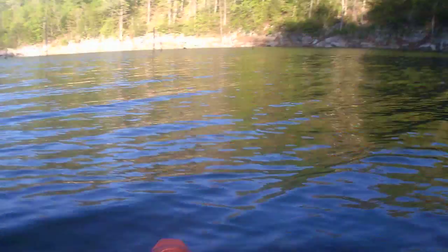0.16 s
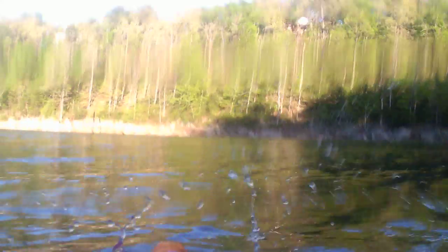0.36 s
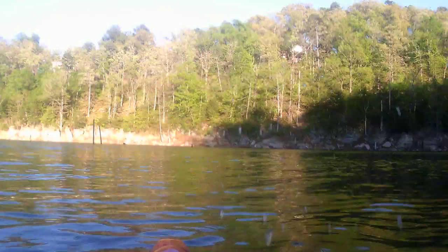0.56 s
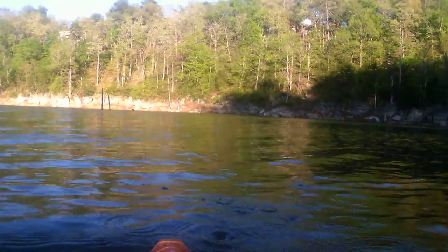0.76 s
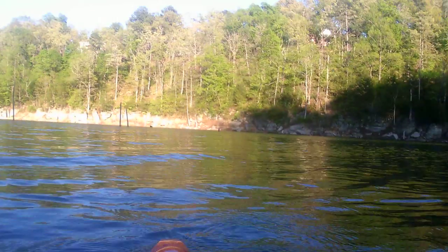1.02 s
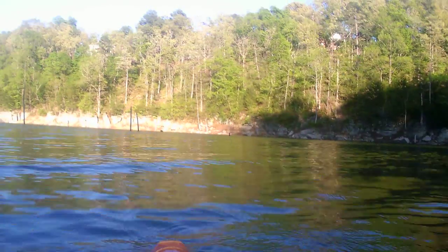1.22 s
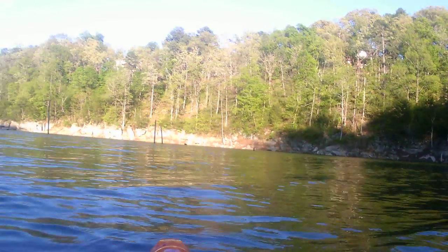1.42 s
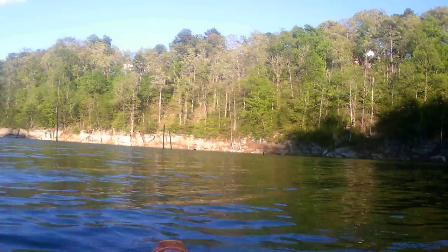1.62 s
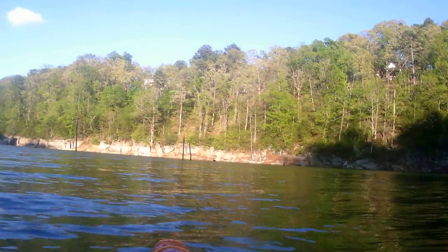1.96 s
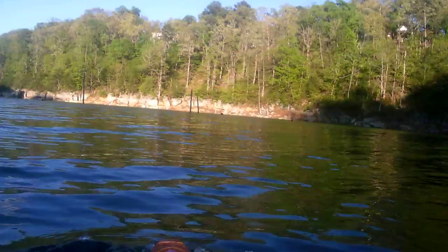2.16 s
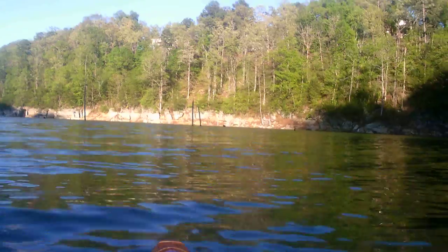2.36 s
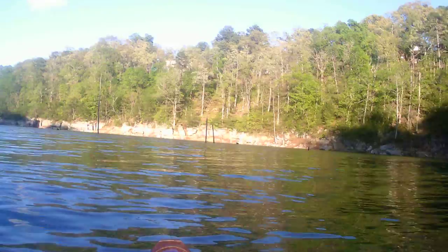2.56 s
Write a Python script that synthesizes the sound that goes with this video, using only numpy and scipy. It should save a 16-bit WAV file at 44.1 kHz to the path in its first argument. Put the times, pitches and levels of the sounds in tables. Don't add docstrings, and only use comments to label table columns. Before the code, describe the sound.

Aboard a model boat on a lake, a closed-in, dull microphone catches splashing slaps, then runoff and drops, then separate gritty motor buzzes with quiet gaps, ending in the loudest burst amid water.

```python
import sys
import numpy as np
from scipy import signal
from scipy.io import wavfile
from scipy.ndimage import uniform_filter1d

SR = 44100
rng = np.random.default_rng(int(sys.argv[2]) if len(sys.argv) > 2 else 0)


def nominal_scale(level):
    x = np.asarray(level, float) / 20
    return 10 ** x


def int16_out(signal):
    q = np.round(np.clip(np.atleast_2d(signal).T, -1, 1) * 32767)
    wavfile.write(sys.argv[1], SR, q.astype(np.int16))


N = 119070

# (start [s], length [s], power [dB], shaft speed [turns/s], coasting decay [dB/s])
THROTTLE_BURSTS = [
    (0.223, 0.17, -4.5, 52.3, 198),
    (1.085, 0.18, 0.5, 53.4, 64.5),
    (1.479, 0.18, -0.5, 52.2, 141.5),
    (1.706, 0.032, -8.5, 70, 127.5),
    (2.222, 0.17, -1.5, 52, 97),
    (2.659, 0.11, 4.5, 55, 100),
]
# (multiple of shaft speed, level [dB])
SHAFT_ORDERS = [(1, -2.5), (2, -12.5), (3, -8), (4, -10), (6, -15), (7, -15.5)]
# (frequency [Hz], level [dB], t60 [s])
KICK_MODES = [(151.8, 5.5, 0.15), (185.5, 3, 0.15), (355, -6, 0.12)]
# (frequency [Hz], width [Hz], level [dB])
HULL_MODES = [(86, 14, -13), (149.5, 13, -9.5), (192.7, 48, -11), (284.1, 8.5, -9.5), (338, 63, -12),
              (484, 110, -12.5), (652.7, 60, -10), (949, 140, -6.5), (1246, 313, -10), (1600, 86, -5.5),
              (2047, 300, -21.5), (2520, 160, -21), (3600, 520, -45)]
# (time [s], mount swing [dB], thump [dB], crack [dB], crack length [s])
WAVE_SLAPS = [(0, -33.5, -31.5, -63, .01), (0.093, -31, -1, 3, 0.0087), (0.102, -35.5, -8.5, -21, 0.015),
              (0.145, -22.5, -4, -35, 0.0077), (0.201, -17, -11.5, -47, 0.026),
              (0.225, -23.5, -4, -2, 0.011), (0.242, -41, 3.5, 8.5, .01), (0.274, 6.5, -4, -2, .01),
              (0.308, -9, -8, -4.5, 0.02), (0.34, -7.5, 1.5, -1.5, 0.0053), (0.375, 2.5, -12, -14, .01),
              (1.3, -16, -2, -21.5, 0.023), (1.425, -19.5, -16.5, -40.5, .01),
              (1.751, -10, -8, -31.5, 0.014), (1.897, -31.5, -32, -38, 0.0036),
              (2.019, -28.5, -38, -42, 0.016), (2.097, -25, -31, -43.5, .01),
              (2.454, -18, -11.5, -29.5, 0.018), (2.583, -38.5, -10.5, -18.5, .01)]
# (frequency [Hz], level [dB], t60 [s])
THUMP_MODES = [(58.62, 0, 0.18), (88.55, -7.5, 0.39), (120.7, 0, 0.11), (170, 0, 0.079), (280, -25.5, 0.64)]
# (time [s], level [dB], pitch [Hz], length [s], splashiness [0-1])
WATER_DROPS = [(0.464, -25, 1650, 0.014, 1), (0.54, -20, 1700, 0.073, 0.7), (0.572, -26, 1600, 0.044, 0.3),
               (0.623, -29.5, 1498, 0.057, 0.66), (0.656, -24.5, 1600, 0.037, .4),
               (0.714, -23, 1750, 0.02, .6), (0.726, -20.5, 1620, 0.025, 0.55),
               (0.774, -34, 1606, 0.033, 0), (0.816, -36.5, 1500, 0.0094, .4),
               (0.858, -35.5, 1450, 0.0061, 0), (0.876, -38.5, 1600, .014, 0.3), (0.931, -36, 1680, .01, 0),
               (0.951, -35, 1650, 0.039, 0), (1.017, -48, 1650, 0.048, 0), (1.925, -31.5, 1700, 0.021, 0.1),
               (1.995, -30.5, 1600, 0.035, 0), (2.061, -19, 1600, 0.025, 0.3),
               (2.096, -14, 1650, 0.027, 0.6), (2.125, -14, 1600, 0.01, 0.5),
               (2.132, -16.5, 1600, 0.018, 0.97), (2.16, -25, 1600, 0.0076, .7),
               (2.2, -31, 1600, 0.0075, 0.7), (2.578, -6.5, 1650, 0.016, 0.6),
               (2.606, -12, 1550, 0.024, .7)]
# (time [s], level [dB])
RUNOFF = [
    (0, -43.5),
    (0.121, 9.5),
    (.22, -9.5),
    (.5, 3.5),
    (.75, -2.5),
    (1.05, -39),
    (1.9, -16.5),
    (2.202, -3.5),
    (2.5, 11),
    (2.7, 4),
]
# (low edge [Hz], high edge [Hz])
HISS_BAND_HZ = [5800, 8300]


def evened(x):
    return x / np.sqrt(np.mean(x ** 2) + 1e-20)


def add(mix, start_s, sound):
    part = mix[round(start_s * SR):][:len(sound)]
    part += sound[:len(part)]


def resonate(x, hz, width_hz):
    r = np.exp(-np.pi * width_hz / SR)
    gain = (1 - r * r) / 2
    return signal.lfilter([gain, 0, -gain], [1, -2 * r * np.cos(2 * np.pi * hz / SR), r * r], x)


def resonate_twice(x, hz, width_hz):
    return resonate(resonate(x, hz, width_hz), hz, width_hz)


def drift(per_s):
    size = max(int(SR / per_s), 2)
    return evened(uniform_filter1d(uniform_filter1d(rng.standard_normal(N), size), size))


def ring(hz, db, t60_s, t):
    return nominal_scale(db - 60 * t / t60_s) * np.sin(2 * np.pi * hz * t)


def hull(x):
    body = np.zeros(len(x))
    for k, (hz, width_hz, db) in enumerate(HULL_MODES):
        body += (-1) ** k * nominal_scale(db) * resonate(x, hz, width_hz) * np.sqrt(2000 / width_hz)
    return signal.lfilter(*signal.butter(1, 3000, fs=SR), body)


def water():
    lap_db, sway_db = -50.5, -34
    trickle_per_s, trickle_db, grain_decay_s = 130, -30.5, 0.0086
    wet = nominal_scale(np.interp(np.arange(N) / SR, *np.transpose(RUNOFF)))
    clicks = (rng.random(N) < trickle_per_s / SR) * nominal_scale(1.4 * np.minimum(rng.exponential(1, N), 3))
    envelope = signal.oaconvolve(clicks, np.exp(-np.arange(900) / SR / grain_decay_s))[:N]
    trickle = nominal_scale(trickle_db) * wet * envelope * rng.standard_normal(N)
    lap = rng.standard_normal(N) * nominal_scale(lap_db + 1.4 * drift(30))
    sway = evened(resonate(rng.standard_normal(N), 34, 1.3))
    heave = evened(resonate_twice(rng.standard_normal(N), 57, 20))
    return hull(lap + trickle) + nominal_scale(sway_db) * (sway + 0.4 * heave)


def drops():
    rise_s = 0.002
    tone, splash, t = np.zeros(N), np.zeros(N), np.arange(4000) / SR
    for start_s, db, hz, length_s, wet in WATER_DROPS:
        puff = rng.standard_normal(len(t))
        shape = nominal_scale(db - 20 * (t / length_s) ** 2.37) * np.minimum(t / rise_s, 1)
        add(tone, start_s, (1 - wet) * shape * evened(resonate_twice(puff, hz, 240)))
        add(splash, start_s, wet * shape * puff)
    high = signal.lfilter(*signal.butter(2, 500, "high", fs=SR), splash)
    cavity = resonate(high, 2700, 200) + nominal_scale(-31) * resonate(high, 3040, 400)
    return tone + nominal_scale(2.5) * hull(high) + cavity


def slaps():
    mount_hz, mount_t60_s = 34.07, 1.1
    thump_rise_s, crack_rise_s, crack_fall_db_per_s = 0.004, 0.0028, 6600
    low, crack, t = np.zeros(N), np.zeros(N), np.arange(2 * SR) / SR
    crack_t = t[:9000]
    thump = sum(ring(*mode, t) for mode in THUMP_MODES) * np.minimum(t / thump_rise_s, 1)
    for start_s, mount_db, thump_db, crack_db, length_s in WAVE_SLAPS:
        add(low, start_s, ring(mount_hz, mount_db, mount_t60_s, t) + nominal_scale(thump_db) * thump)
        fall_db = crack_fall_db_per_s * np.maximum(crack_t - length_s, 0)
        add(crack, start_s, nominal_scale(crack_db - fall_db) * np.minimum(crack_t / crack_rise_s, 1))
    noise = crack * rng.standard_normal(N)
    return low + nominal_scale(-1.5) * hull(noise) + nominal_scale(17) * resonate(noise, 1573, 200)


def buzz_envelope(t, length_s, power_db, coast_db_per_s):
    rise_s, swell, swell_s, sag_db = 0.012, 0.43, 0.048, -2
    cut_db, cut_s = -7.5, 0.041
    off_s = np.maximum(t - length_s, 0)
    level_db = power_db + sag_db * np.minimum(t / length_s, 1) ** 3
    level_db += cut_db * (1.5 - np.exp(-off_s / cut_s)) - coast_db_per_s * off_s
    return np.minimum(t / rise_s, 1) * (1 - swell * np.exp(-t / swell_s)) * nominal_scale(level_db)


def motor():
    waver_share, wobble_db, spin_up = 0.04, 1.5, 0.1
    shake_lag_s, shake_hold_s, shake_fade_db_per_s = 0.046, 0.012, 200.5
    kick_rise_s, grain_db, rumble_db = 0.003, 2, -22
    buzz, shake, t = np.zeros(N), np.zeros(N), np.arange(SR) / SR
    waver = 1 + waver_share * drift(11.46)
    wobbles = [wobble_db * drift(25) for _ in SHAFT_ORDERS]
    kick = sum(ring(*mode, t) for mode in KICK_MODES) * np.minimum(t / kick_rise_s, 1)
    for start_s, length_s, power_db, turns_hz, coast_db_per_s in THROTTLE_BURSTS:
        add(buzz, start_s, buzz_envelope(t, length_s, power_db, coast_db_per_s))
        shift = -round(start_s * SR)
        off_s = np.maximum(t - length_s, 0)
        speed_hz = turns_hz * (1 + spin_up * (np.minimum(t / length_s, 1.2) ** 3 - 0.3))
        turns = np.cumsum(speed_hz * np.roll(waver, shift)[:SR]) / SR
        lines = np.zeros(SR)
        for (k, db), wobble in zip(SHAFT_ORDERS, wobbles):
            line_db = db - (k - 1.5) * 150 * off_s + np.roll(wobble, shift)[:SR]
            lines += nominal_scale(line_db) * np.sin(2 * np.pi * k * turns)
        late_s = np.maximum(off_s - shake_hold_s, 0)
        lines *= (1 - np.exp(-t / shake_lag_s)) * nominal_scale(-shake_fade_db_per_s * late_s)
        add(shake, start_s, nominal_scale(power_db) * (lines + kick))
    grain = evened(rng.standard_normal(N) * nominal_scale(grain_db * np.tanh(drift(220))))
    rumble = np.minimum(buzz / 0.18, 1) ** 0.76 * evened(resonate_twice(grain, 80, 45))
    return nominal_scale(8) * hull(buzz * grain) + nominal_scale(1) * shake + nominal_scale(rumble_db) * rumble


def scene():
    return (water() + drops() + slaps() + motor())[None]


def low_pass(x):
    return signal.sosfilt(signal.butter(12, 16000, fs=SR, output="sos"), x)


def record(dry):
    mic_hz, edge_hz, hiss_db = 4100, 8360, -78.5
    clip, offset, leak_db = 0.712, 0.002, -10.5
    dull = signal.sosfilt(signal.butter(8, mic_hz, fs=SR, output="sos"), dry)
    hiss_band = signal.butter(5, HISS_BAND_HZ, "band", fs=SR, output="sos")
    hiss = nominal_scale(hiss_db) * evened(signal.sosfilt(hiss_band, rng.standard_normal(N)))
    clipped = np.clip(dull + hiss + offset, -clip, clip)
    soft = signal.sosfiltfilt(signal.butter(6, edge_hz, fs=SR, output="sos"), clipped)
    return low_pass(soft + nominal_scale(leak_db) * (clipped - soft))


dry = scene()
out = record(dry)
int16_out(out)
```